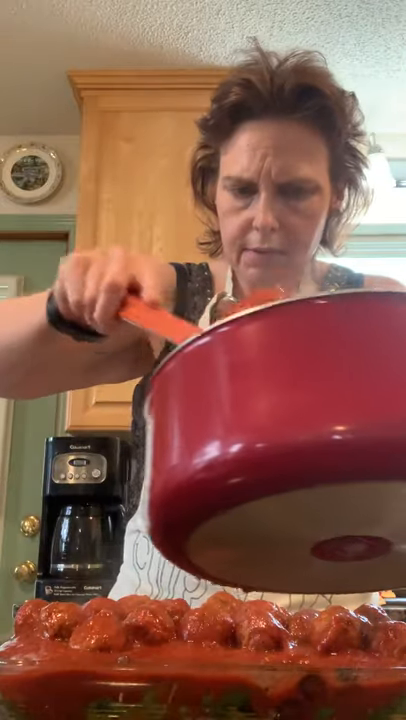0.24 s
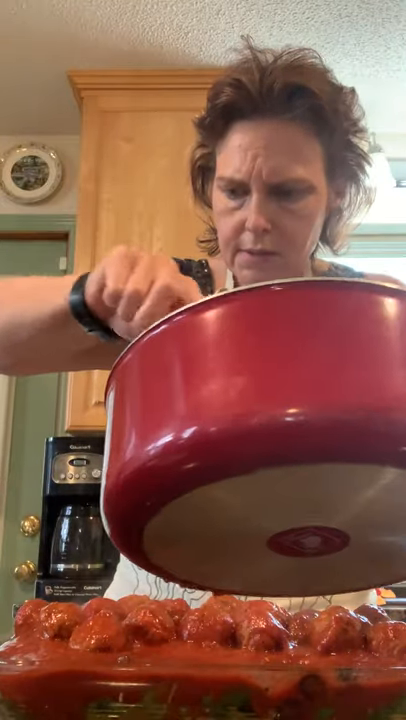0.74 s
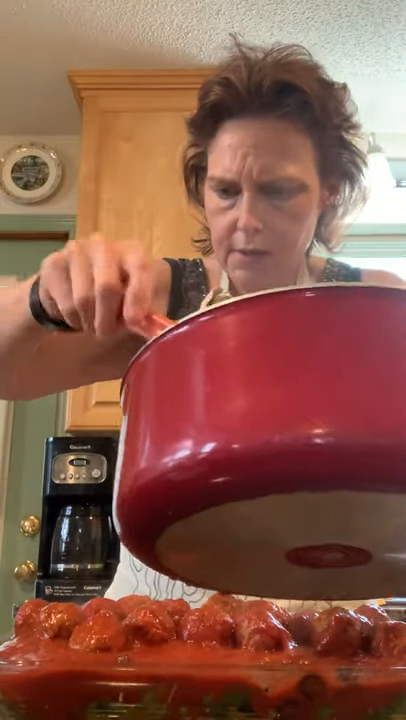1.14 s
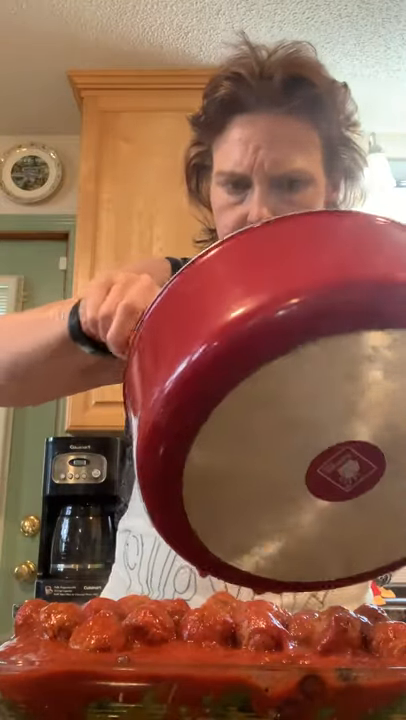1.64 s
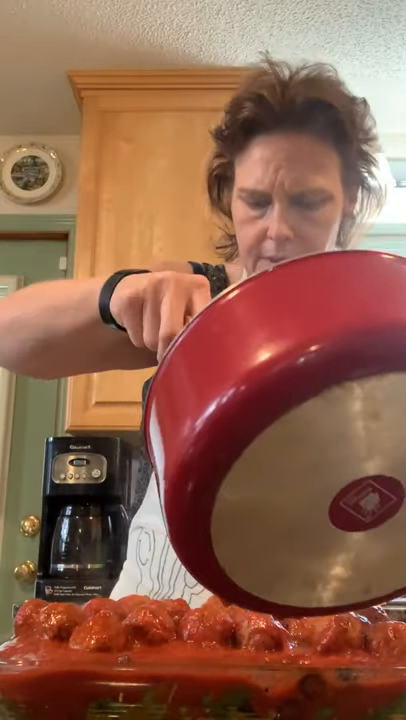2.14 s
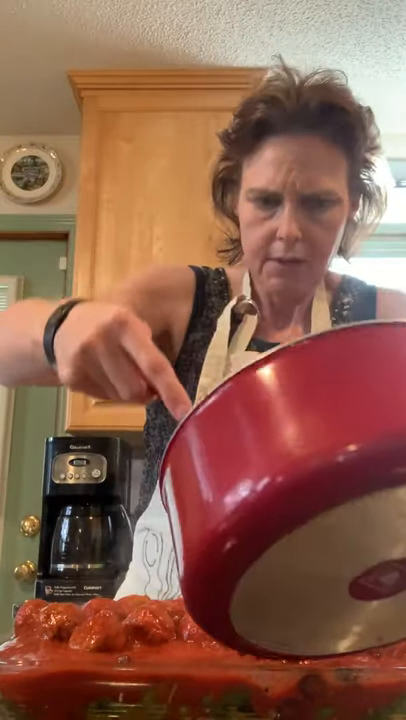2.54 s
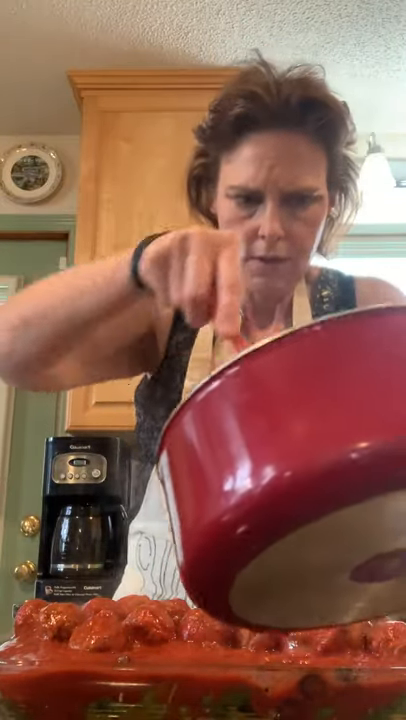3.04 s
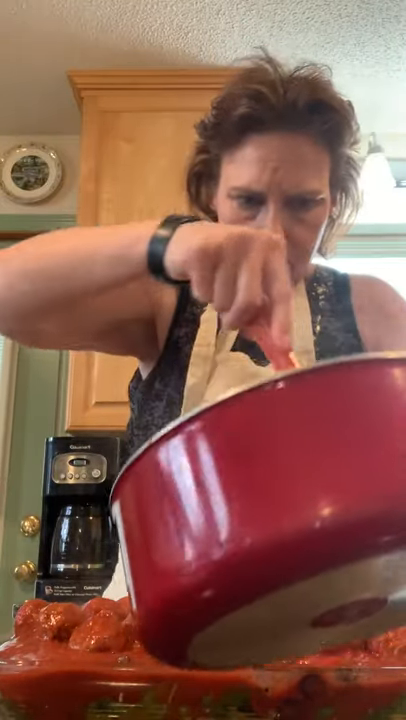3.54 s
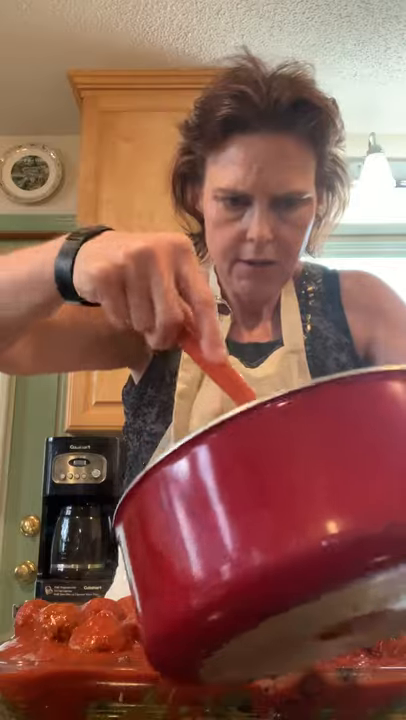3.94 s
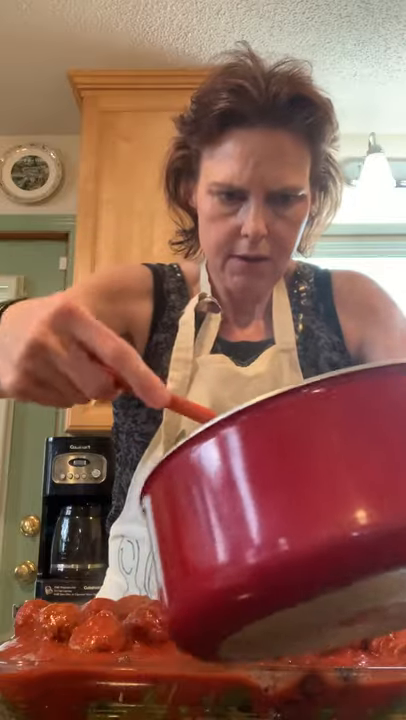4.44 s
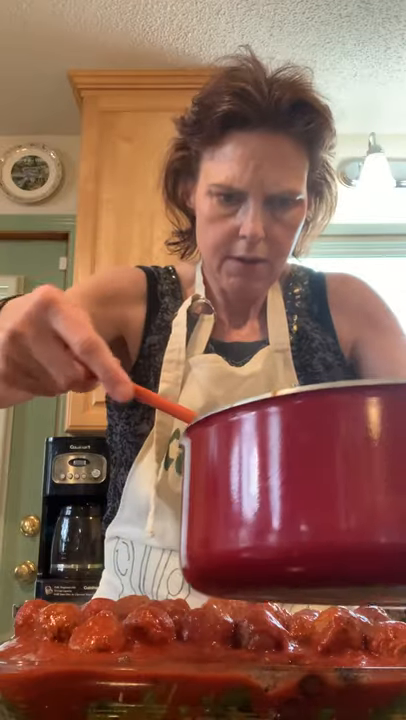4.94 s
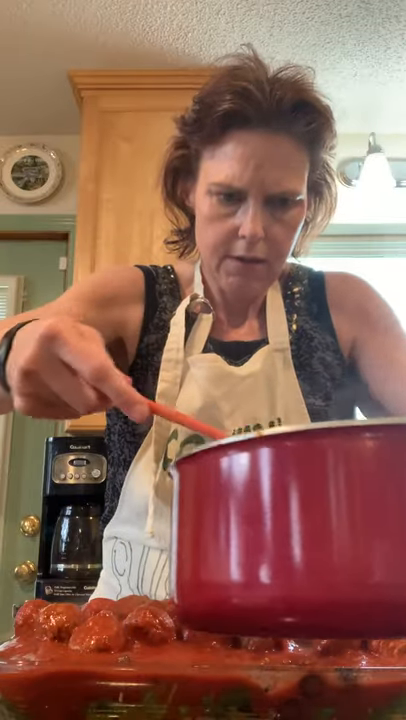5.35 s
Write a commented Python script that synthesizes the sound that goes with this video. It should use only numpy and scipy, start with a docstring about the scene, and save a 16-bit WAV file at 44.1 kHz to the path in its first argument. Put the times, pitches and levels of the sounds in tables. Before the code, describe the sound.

A quiet home kitchen, heard close in stereo, with low soft air noise and a faint wavering appliance hum throughout. A spoon scoops meatballs and sauce from a large pot. At 0.5 s two light knocks run into a short scrape, followed by soft rubbing. A firm, hollow, choked knock lands at 0.9 s. After faint rubs and taps, a scrape at 1.5 s leads into a cluster of clacks at 1.6 to 1.8 s, the first with a slightly longer metallic ring. From 2 to 3.2 s there are mostly light, gritty scrapes, drag and barely audible taps. A clear dull knock comes at 3.8 s, a weak tick at 4.3 s, then the loudest, fullest clonk at 4.9 s and a softer knock at 5.2 s, fading into faint rubbing. Hollow notes sit near 600 to 700 Hz, left of centre, dying almost instantly into a short room tail.

```python
"""A serving spoon knocks on the wall of a big hand-held pot as it scoops meatballs and sauce in a quiet kitchen.
Each knock is a brief clack and ping, then decaying wall modes choked by hand and sauce.
Scrapes are random slips that excite wall and spoon modes; rubs are fine slips in one resonance.
Light taps and wet clicks of the sauce are short noise bursts; the room adds echoes and a diffuse tail.
Behind it are shaped air noise and the wavering hum lines of an appliance."""
import sys
import numpy as np
from scipy import signal
from scipy.io import wavfile

SR = 44100
rng = np.random.default_rng(int(sys.argv[2]) if len(sys.argv) > 2 else 0)


def dump_mix(stems):
    """Bounce the given channels to the path in sys.argv[1] as a 16-bit WAV at rate SR."""
    frames = np.atleast_2d(stems).T  # one column per channel
    limited = np.clip(frames, -1, 1)  # hard clip at full scale
    pcm = np.round(limited * 32767).astype(np.int16)
    wavfile.write(sys.argv[1], SR, pcm)


N = 246298
TIME = np.arange(N) / SR
BLOW = TIME[:SR // 5]   # time within one blow, s

# Levels in the tables are relative. Mode lives (t60_s) are divided by the damping of each contact.
# spoon on the pot wall: start_s, strength_db, wall_pitch_hz, choked_t60_s, overtone_hz, overtone_db,
# upper_modes_db, clack_hz, clack_db, lasting_ring_db, spoon_pitch_hz, spoon_ping_db, edge_hiss_db
WALL_KNOCKS = [(0.490, -32, 652, 0.027, 1100, -41, -40.5, 2500, -37.5, -58, 4130, -40, -54),
               (0.552, -34.5, 653, 0.03, 1080, -48, -40, 2200, -41.5, -53.5, 4070, -54, -64),
               (0.920, -18, 620, .021, 1080, -47.5, -56, 1590, -41, -40, 4140, -44.5, -57.5),
               (1.633, -26.5, 687, 0.027, 1010, -40, -41.5, 2150, -41.5, -28.5, 3440, -39.5, -51.5),
               (1.698, -44, 630, 0.028, 1000, -67, -58, 2400, -70, -51, 4030, -64, -75),
               (1.736, -30.5, 627, .026, 1000, -68, -46, 2520, -55, -38.5, 2860, -52, -52.5),
               (1.816, -37, 616, 0.027, 1000, -68, -50, 2430, -60.5, -52, 2950, -64, -60.5),
               (1.985, -47, 600, 0.011, 980, -69, -49, 1700, -64, -55, 3850, -69, -75),
               (2.392, -47, 585, 0.065, 1010, -63, -59, 1720, -61, -67, 4440, -71, -75),
               (2.456, -47, 700, 0.038, 1030, -65, -60, 1710, -70, -61, 4440, -70, -73),
               (2.787, -49, 723, 0.049, 1000, -57, -66, 2200, -73, -67, 4050, -75, -75),
               (3.046, -48, 665, 0.027, 980, -66, -64, 2570, -65, -73, 3260, -66, -75),
               (3.157, -49, 690, 0.041, 1010, -68, -52, 1700, -59, -60, 4950, -61, -65),
               (3.836, -26, 672, 0.018, 1057, -41.5, -61, 1900, -66, -53, 3950, -85.5, -72),
               (4.314, -41, 630, 0.0057, 1130, -47.5, -45, 1590, -49, -72, 4260, -51.5, -80),
               (4.903, -16.5, 602, 0.025, 968, -20.5, -24.5, 1940, -35.5, -36.5, 4170, -43, -52),
               (5.196, -32.5, 636, 0.043, 1077, -39.5, -46, 1870, -46, -47, 4000, -70, -65)]
# light taps of the spoon and wet clicks of the sauce: start_s, body_db, wet_snap_db
LIGHT_TICKS = [(0.892, -67, -64), (1.176, -57, -80), (1.462, -47, -85), (1.628, -40, -49),
               (1.706, -67, -59), (2.035, -62, -52.5), (2.359, -57, -81), (2.749, -56, -78),
               (2.883, -51.5, -74), (3.173, -50, -56), (3.835, -70, -71), (3.946, -57, -63.5),
               (4.146, -59.5, -75), (4.883, -47.5, -64), (5.026, -73, -59.5), (5.092, -45, -53.5)]
# scraping along the wall: start_s, length_s, wall_ring_db, rasp_db (both before the overall levels below)
SCRAPE_STROKES = [(0.492, 0.041, -56.5, -66), (0.599, .11, -52.5, -68.5), (1.482, 0.092, -52, -73),
                  (1.7, 0.13, -55.5, -65), (1.964, 0.14, -57.5, -71), (2.134, 0.13, -61.5, -74.5),
                  (2.37, 0.15, -51, -67.5), (2.584, 0.17, -69, -74.5), (2.743, 0.19, -58, -77),
                  (2.963, 0.12, -53, -78.5), (3.144, 0.059, -49.5, -61)]
# handle over the rim, bowl through the sauce: middle_s, length_s (held to 0.02-0.5), resonance_hz,
# width_hz, level_db (before RUB_DB)
SOFT_RUBS = [(0.525, 0.053, 2500, 2800, -74), (0.645, 0.04, 3900, 1200, -77), (0.803, 0.47, 3740, 714, -75),
             (1.024, 0.61, 2750, 410, -75), (1.309, 0.18, 1780, 780, -70), (1.475, 0.17, 2870, 1940, -68),
             (2.014, 0.2, 3170, 1400, -69), (2.427, 0.12, 4430, 500, -71.5), (2.43, 0.12, 6100, 1200, -76),
             (2.647, 0.17, 3040, 2770, -71), (3.03, 0.087, 2970, 910, -70), (3.165, 0.045, 4720, 397, -67),
             (3.92, 0.099, 2792, 550, -73.5), (4.655, 0.035, 3630, 1195, -68.5),
             (4.749, 0.19, 2710, 1720, -74), (5.312, 0.26, 2640, 1070, -70.5),
             (5.542, 0.36, 2700, 1070, -70)]
# first overtones of the wall: multiple of the overtone pitch, level_db, t60_s
OVERTONE_MODES = [(.905, 8, 0.012), (1, -5.5, 0.041)]
# higher modes of the wall: pitch_hz, level_db, t60_s
UPPER_WALL_MODES = [(1279, 6.5, 0.068), (1294, 4.5, 0.066), (1409, -0.5, 0.046), (1627, -12, .05)]
# free modes of the wall, singing on after the spoon has left: pitch_hz, level_db, t60_s
FREE_WALL_MODES = [(672, 9, .11), (706.8, 4.5, 0.12), (1260, -8.5, 0.12), (1305, -2.5, .12)]
# short bright modes of the rim: pitch_hz, level_db, t60_s
RIM_MODES = [(1696, 6, 0.031), (1951, 1.5, 0.044), (2085, -7.5, 0.017), (2402, -1, 0.044), (2590, -9, .04),
             (2727, -4.5, 0.03), (3272, -7, 0.039)]
# modes of the spoon, moving with grip and point of contact: multiple of its pitch, level_db, t60_s
SPOON_MODES = [(.41, -3, .015), (.64, -0.5, 0.015), (1.002, -2, 0.023), (1.4, -16.5, .02)]
# modes scratched into life by the spoon's edge: pitch_hz, level_db, t60_s
RASP_MODES = [(1623, 8.5, 0.016), (2296, 5, 0.0076), (2780, 0.5, 0.012), (3330, -4.5, 0.011),
              (3680, -7.5, 0.015), (4220, -7, 0.025), (5140, -17, .013), (6350, -14.5, 0.028),
              (6840, -16.5, 0.038)]
# appliance hum lines: pitch_hz, level_db (rms)
HUM_LINES = [(59.2, -68), (172.3, -62.5), (204.6, -62), (296.1, -66), (355.3, -70)]
# spectrum of the air noise: frequency_hz, density_db (per Hz)
AIR_SPECTRUM = [(25, -22.5), (55, -11.5), (80, -5), (130, -6), (200, 2), (270, -4), (420, -9), (800, -21.5),
                (1500, -31), (3000, -44.5), (6300, -44.5), (8000, -66), (10000, -55), (12600, -45.5),
                (16000, -68)]
# left-right likeness of the air noise: frequency_hz, likeness (held to 0-1)
AIR_LIKENESS = [(60, 0.59), (150, 1), (380, 0.59), (950, -1.3), (2380, -0.08), (5980, -0.31),
                (15000, -0.11)]
# left-right balance of the air noise: frequency_hz, balance_db (positive to the left)
AIR_BALANCE = [(60, -4), (240, 5.5), (950, 2.5), (3770, 0.5), (15000, 0.0)]
# first echoes from counter, cupboards and ceiling: delay_s, left_gain, right_gain
FIRST_ECHOES = [(.0062, 0.12, 0.044), (.0165, 0.11, 0.19), (.0295, .12, .07), (.0405, 0.057, 0.012)]
# diffuse tail: frequency_hz, level_db
TAIL_SPECTRUM = [(300, -17.5), (650, -3.5), (1300, 0.5), (2200, 2), (4000, -2), (7000, 1.5), (14000, -10.5)]
# diffuse tail: frequency_hz, t60_s
TAIL_DECAY = [(300, 0.24), (1300, 0.36), (2500, 0.29), (4500, 0.21), (14000, 0.077)]
# narrow dips in the reflected sound: frequency_hz, q, gain_db
ROOM_DIPS = [(596, 9, -9), (1050, 3.7, -9)]

WALL_HZ = 641   # pitch of the scraped wall before the grip shifts it
BELLY_HZ, BELLY_T60_S = 535, 0.06
FIRM_DB = -22.5   # strength of an ordinary firm knock
BELLY_DB, BELLY_GROWTH = -46.5, 2.57   # level at a firm knock; dB per dB of strength
NOTE_PAN_DB, PAN_GROWTH = 19, 0.22   # left-right at a firm knock; dB per dB of strength
FREE_WALL_HZ, LET_GO_S = 700, 0.043   # the note glides at a rate that would reach this pitch in this time
CLACK_SPREAD = 1.437   # ratio of the clack's band edges to its centre
CRUNCH_T60_S, CLACK_RING_SHARE = 0.012, 0.9   # rim modes against the crunch
BITE_SHARE = 0.43   # crunch of the contact against the spoon's ping
TICK_MIDDLE_DB = -11   # a tick's middle range against its body
STROKE_ATTACK_S, STROKE_RISE_DB, STROKE_RELEASE_S = 0.012, 2, 0.063
# light drag while the pot is tipped: start_s, length_s, wall_ring_db, rasp_db, as in the strokes
DRAG = (2.1, 2.7 - 2.1, -64.5, -81)
SLIPS_PER_S, SLIP_SPREAD_DB = 900, 3
JUDDER_DB, JUDDER_PER_S = 0.45, 82   # rms unevenness of slip size; rate of its random knots
GRIP_SHIFT = 0.055   # largest upward share by which angle and grip move the modes
WALL_SCRAPE_DB, RASP_DB, RUB_DB = -4, -2.5, -10   # overall levels of scrapes and rubs
AIR_DB = -56   # rms of the air noise
CUTOFF_HZ = 15100


def from_db(db):
    """Converts decibels to an amplitude ratio."""
    return 10 ** (np.asarray(db) / 20)


def rms_one(x):
    """Scales a signal to unit root-mean-square."""
    return x / np.sqrt(np.mean(x ** 2) + 1e-20)


def peak_one(x):
    """Scales a signal to unit peak."""
    return x / (np.abs(x).max() + 1e-20)


def at_hz(points, hz):
    """Interpolates a spectrum on a logarithmic frequency axis."""
    points = np.array(points)
    return np.interp(np.log(hz), np.log(points[:, 0]), points[:, 1])


def band(x, low_hz, high_hz):
    """Causal band-pass filtering."""
    edges = [low_hz, min(high_hz, SR / 2 - 1000)]
    return signal.sosfilt(signal.butter(2, edges, "band", fs=SR, output="sos"), x)


def bell(x, hz, q, db):
    """Resonant equalisation: lifts or cuts a narrow band."""
    peak = signal.lfilter(*signal.iirpeak(hz, max(q, 1), fs=SR), x)
    return x + (from_db(db) - 1) * peak


def thirds():
    """Third-octave analysis: lower edge, upper edge and centre of each band."""
    edges = 22 * 2 ** (np.arange(30) / 3)
    return zip(edges, edges[1:], np.sqrt(edges[1:] * edges[:-1]))


def drift(rate):
    """Slow random modulation: unit-rms interpolation between `rate` random knots per second."""
    knots = rng.standard_normal(1024)
    return rms_one(np.interp(TIME * rate, np.arange(1024), knots))


def fade(t, t60):
    """Exponential decay: falls 60 dB in t60."""
    return np.exp(-np.log(1000) * t / max(t60, 1e-3))


def panned(x, db):
    """Stereo by level difference: positive favours the left; the mean gain stays one."""
    gains = from_db([[db / 2], [-db / 2]])
    return x * gains / gains.mean()


def add(out, s, sound):
    """Superposition: mixes a sound in at time s."""
    i = max(round(s * SR), 0)
    out[..., i:i + sound.shape[-1]] += sound[..., :out.shape[-1] - i]


def swell(hz, t60, rise_hz_per_s=0):
    """Wall-to-air coupling: the tone builds, may glide, then decays; its lows barely radiate."""
    tone = np.sin(2 * np.pi * (hz + rise_hz_per_s * BLOW / 2) * BLOW)
    return peak_one(band(BLOW * fade(BLOW, t60) * tone, 440, 3600))


def struck(modes, damping):
    """Modal superposition: decaying modes radiate in lobes, so the two sides differ in phase."""
    out = 0
    for k, (hz, db, t60) in enumerate(modes):
        # strength and pitch vary with the place of contact
        strength_db, lobe, detune = rng.uniform(-1.68, 1, 3)
        side_phase = np.array([[0], [1.81 * lobe]])
        phase = 2 * np.pi * hz * (1 + 0.0076 * detune) * BLOW + side_phase
        gain = (-1) ** k * from_db(db + strength_db)
        out = out + gain * fade(BLOW * damping, t60) * np.sin(phase)
    onset = 1 - np.exp(-(BLOW / 0.0013) ** 2)
    return peak_one(out * onset)


def crack(low_hz, high_hz, t60):
    """Impulsive contact noise: a brief band of crunch, partly unlike on the two sides."""
    envelope = fade(BLOW, t60) * (1 - np.exp(-BLOW / 0.00057))
    mid, side = rng.standard_normal((2, len(BLOW))) * envelope
    burst = mid + 1.4 * side * [[1], [-1]]
    return peak_one(band(band(burst, low_hz, high_hz), low_hz, high_hz))


def slip_train(count, per_s, spread_db):
    """Stick-slip friction: impulses at random times, of random sign and uneven size."""
    chance, sign, size = rng.random((3, 2 * SR))[:, :count]
    size_db = spread_db * np.minimum(-np.log(1 - size), 3)
    judder_db = JUDDER_DB * drift(JUDDER_PER_S)[:count]
    return (chance < per_s / SR) * np.sign(sign - 0.5) * from_db(size_db + judder_db)


def pressure(length):
    """Contact force of one stroke: the spoon bites, bears slightly harder and lifts."""
    t = TIME[:int(length * SR)]
    attack = np.minimum(t / STROKE_ATTACK_S, 1)
    release = np.minimum((length - t) / STROKE_RELEASE_S, 1)
    return attack * from_db(STROKE_RISE_DB * t / length) * release


def air_noise(flicker_db):
    """Broadband flow noise: flickering third-octave bands whose two sides are partly alike."""
    air = 0
    white = rng.standard_normal((2, 2, N))   # neighbouring bands use different noise
    for k, (low, high, hz) in enumerate(thirds()):
        mid, side = band(white[k % 2], low, high)
        alike = np.clip(at_hz(AIR_LIKENESS, hz), 0, 1)
        pair = np.sqrt(1 + alike) * mid + np.sqrt(1 - alike) * side * [[1], [-1]]
        gain = from_db(at_hz(AIR_SPECTRUM, hz) + flicker_db * drift(9))
        air = air + panned(pair, at_hz(AIR_BALANCE, hz)) * gain
    return from_db(AIR_DB) * rms_one(air)


def motor_hum(waver):
    """Narrow-band modulation: each line of the appliance motor wavers in amplitude and phase."""
    hum = 0
    for hz, db in HUM_LINES:
        phase = 2 * np.pi * hz * TIME
        line = (1 + waver * drift(12)) * np.sin(phase) + waver * drift(12) * np.cos(phase)
        hum = hum + from_db(db) * rms_one(line)
    return panned(hum, 2.2)


def kitchen(x):
    """Room reverberation: near echoes, then a diffuse tail decaying band by band, with narrow dips."""
    t = TIME[:SR * 2 // 3]
    response = np.zeros((2, len(t)))
    white = rng.standard_normal((2, 2, len(t)))
    for k, (low, high, hz) in enumerate(thirds()):
        decay = fade(t, at_hz(TAIL_DECAY, hz)) * (1 - np.exp(-t / 0.00047))
        decay = decay / np.linalg.norm(decay)
        response += from_db(at_hz(TAIL_SPECTRUM, hz)) * band(white[k % 2], low, high) * decay
    for s, left, right in FIRST_ECHOES:
        add(response, s, np.array([[left], [right]]))
    for hz, q, db in ROOM_DIPS:
        response = bell(response, hz, q, db)
    return signal.fftconvolve(x.mean(axis=0)[None], response, axes=1)[:, :N]


def rubs(grains_per_s, grain_db):
    """Filtered friction: fine slips in one resonance, swelling and fading with the stroke."""
    out = np.zeros((2, N))
    for s, length, hz, width_hz, db in SOFT_RUBS:
        stroke = signal.windows.tukey(int(np.clip(length, 0.02, 0.5) * SR), 0.7)
        friction = slip_train(len(stroke), grains_per_s, grain_db)
        friction = band(friction, max(hz - width_hz / 2, 300), hz + width_hz / 2)
        add(out, s - length / 2, from_db(db + RUB_DB) * stroke * rms_one(friction))
    return out


def ticks():
    """Impulsive contact: taps and wet clicks too light to set the wall ringing."""
    out = np.zeros((2, N))
    for s, body_db, snap_db in LIGHT_TICKS:
        middle = from_db(TICK_MIDDLE_DB) * crack(1300, 4600, t60=0.008)
        body = crack(390, 1640, t60=0.012) + middle
        snap = crack(2600, 18000, t60=0.011)
        add(out, s, from_db(body_db) * body + from_db(snap_db) * snap)
    return panned(out, 1.6)


def scraped_wall(grip):
    """Impulse response of the wall to one slip, its modes shifted by the grip."""
    modes = [(hz * grip, db, t60) for hz, db, t60 in UPPER_WALL_MODES]
    upper = 1.14 * struck(modes, damping=5.6)
    return swell(WALL_HZ * grip, t60=0.036) + upper + 0.5 * crack(820, 1270, t60=0.0088)


def scratched_edge(grip):
    """Impulse response of the scratched modes to one slip, shifted by the grip."""
    modes = [(hz * grip, db, t60) for hz, db, t60 in RASP_MODES]
    return struck(modes, damping=1.2) + 0.1 * crack(1000, 4300, t60=0.0016)


def scraping(count=6):
    """Stick-slip excitation: slips ring wall and edge, coloured anew at each place along the stroke."""
    out = np.zeros((2, N))
    for start, length, ring_db, rasp_db in SCRAPE_STROKES + [DRAG]:
        press = pressure(length)
        slips = slip_train(len(press), SLIPS_PER_S, SLIP_SPREAD_DB)
        place = np.arange(len(press)) * count // len(press)
        ring = rasp = 0
        for k in range(count):
            grip = 1 + GRIP_SHIFT * rng.uniform(-0.88, 1)
            local_slips = (slips * (place == k))[None]
            wall, edge = scraped_wall(grip), scratched_edge(grip)
            ring = ring + signal.fftconvolve(local_slips, wall, axes=1)[:, :len(press)]
            rasp = rasp + signal.fftconvolve(local_slips, edge, axes=1)[:, :len(press)]
        ring = panned(from_db(ring_db + WALL_SCRAPE_DB) * rms_one(ring), 13.0)
        rasp = panned(from_db(rasp_db + RASP_DB) * rms_one(rasp), 1.3)
        add(out, start, press * (ring + rasp))
    return out


def knocks(lead_s):
    """Impact excitation: clack and ping lead, then a hollow choked note, overtones and lasting ring."""
    out = np.zeros((2, N))
    for (s, db, hz, t60, overtone_hz, overtone_db, upper_db, clack_hz, clack_db,
         ring_db, spoon_hz, spoon_db, edge_db) in WALL_KNOCKS:
        force_db = db - FIRM_DB
        # as the spoon lets go, the note glides toward the free wall's pitch
        note = from_db(db) * swell(hz, t60, (FREE_WALL_HZ - hz) / LET_GO_S)
        # hard blows reach the pot's belly
        belly = from_db(BELLY_DB + BELLY_GROWTH * force_db) * swell(BELLY_HZ, BELLY_T60_S)
        overtone_modes = [(overtone_hz * ratio, level, life) for ratio, level, life in OVERTONE_MODES]
        overtones = from_db(overtone_db) * struck(overtone_modes, damping=1)
        upper = struck(UPPER_WALL_MODES, damping=3.6) + 0.39 * crack(1200, 1550, t60=0.015)
        ring = from_db(ring_db) * struck(FREE_WALL_MODES, damping=0.66)
        wall = overtones + from_db(upper_db) * upper + ring

        crunch = crack(clack_hz / CLACK_SPREAD, clack_hz * CLACK_SPREAD, t60=CRUNCH_T60_S)
        clack = from_db(clack_db) * (CLACK_RING_SHARE * struck(RIM_MODES, damping=1.3) + crunch)
        spoon_modes = [(spoon_hz * ratio, level, life) for ratio, level, life in SPOON_MODES]
        bite = BITE_SHARE * crack(0.785 * spoon_hz, 1.206 * spoon_hz, t60=0.023)
        ping = from_db(spoon_db) * (struck(spoon_modes, damping=3.3) + bite)
        edge = from_db(edge_db) * crack(5640, 7580, t60=0.022)

        note_pan_db = NOTE_PAN_DB + PAN_GROWTH * force_db
        add(out, s - lead_s / 2, panned(note + belly, note_pan_db) + panned(wall, 3.0))
        add(out, s - lead_s, panned(clack + ping + edge, 0.35))
    return out


def scene():
    """Superposition of the pot's direct sound, its reflections and the background."""
    pot = knocks(lead_s=0.002) + ticks() + scraping() + rubs(grains_per_s=2400, grain_db=1.5)
    return pot + kitchen(pot) + air_noise(flicker_db=1.42) + motor_hum(waver=1.3)


def record(dry):
    """Band limitation: a steep elliptic low-pass cuts the top."""
    return signal.sosfilt(signal.ellip(10, 0.1, 70, CUTOFF_HZ, fs=SR, output="sos"), dry)


dry = scene()
out = record(dry)
dump_mix(out)
```